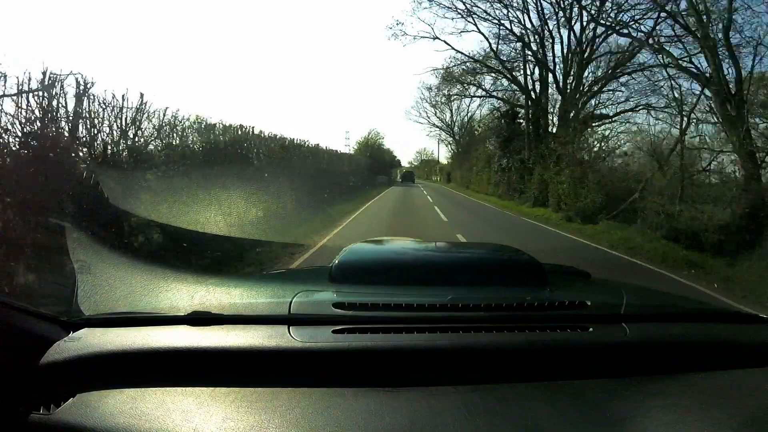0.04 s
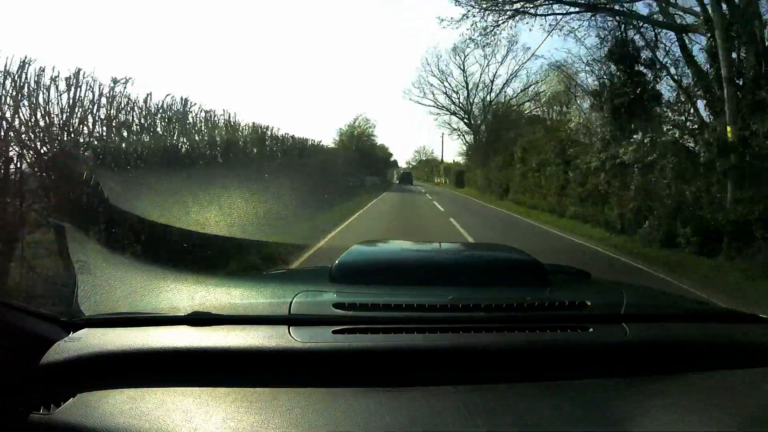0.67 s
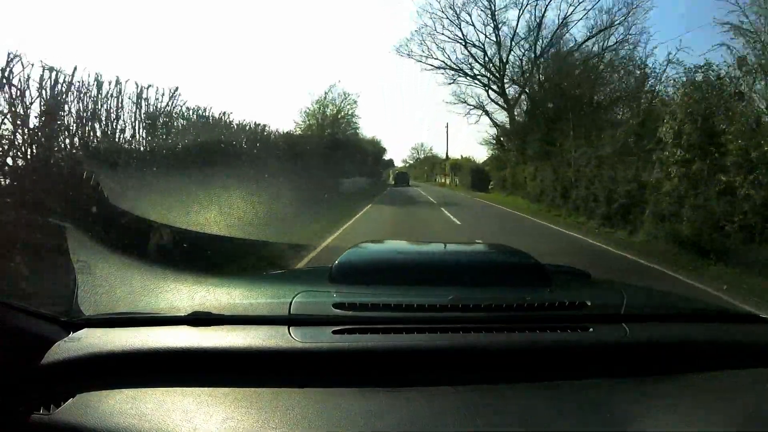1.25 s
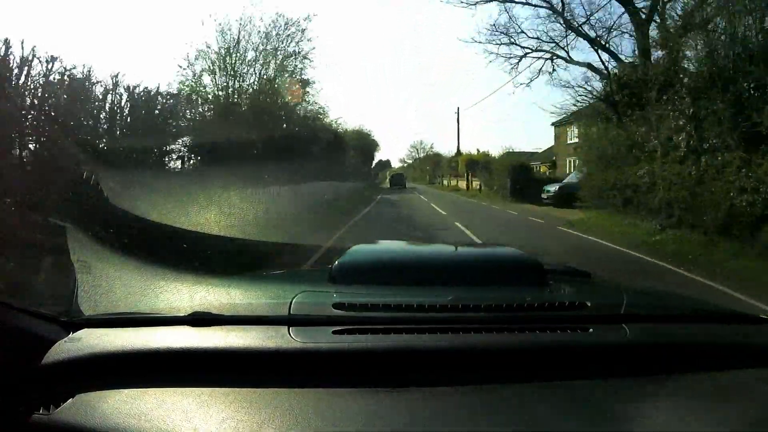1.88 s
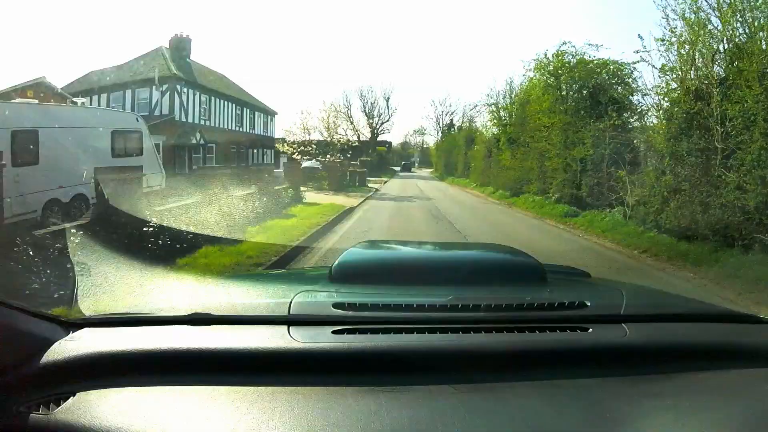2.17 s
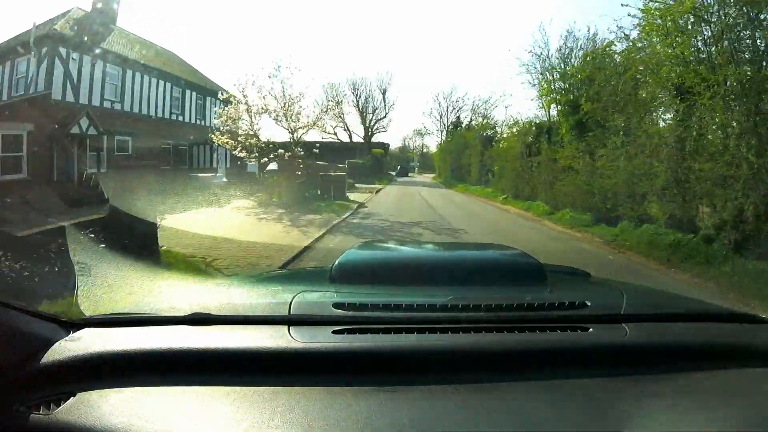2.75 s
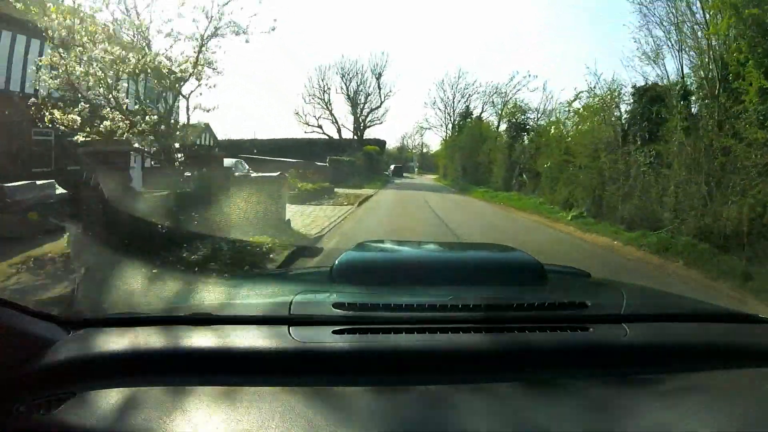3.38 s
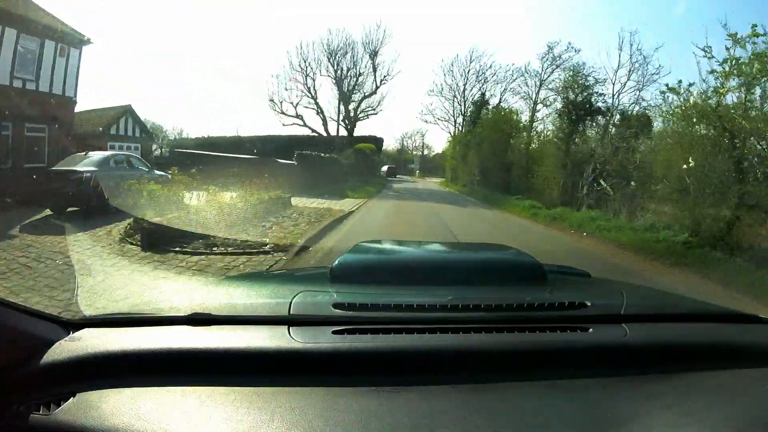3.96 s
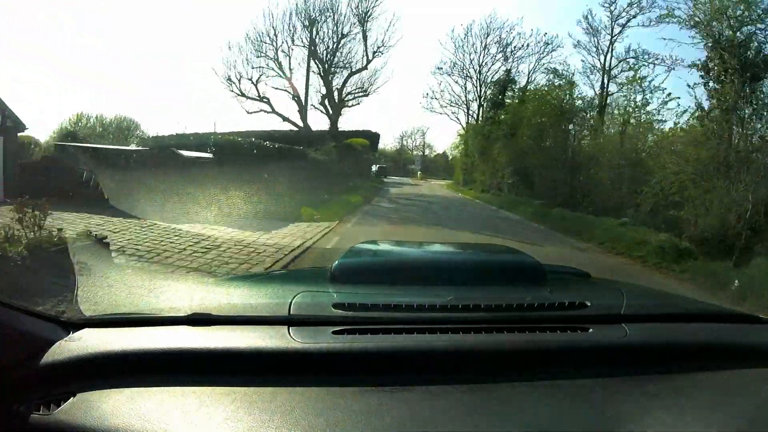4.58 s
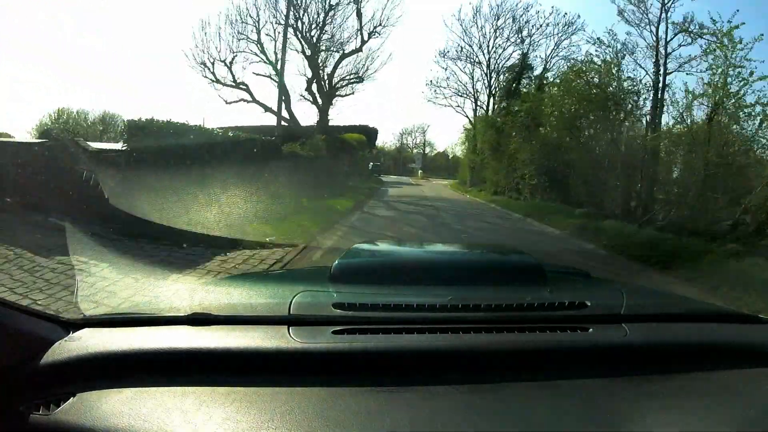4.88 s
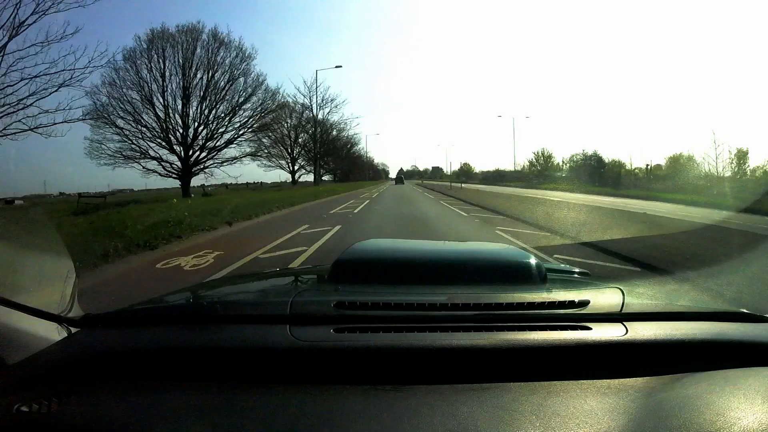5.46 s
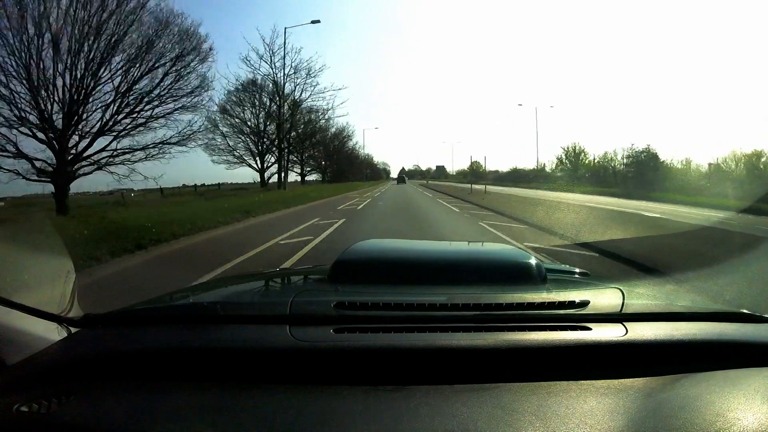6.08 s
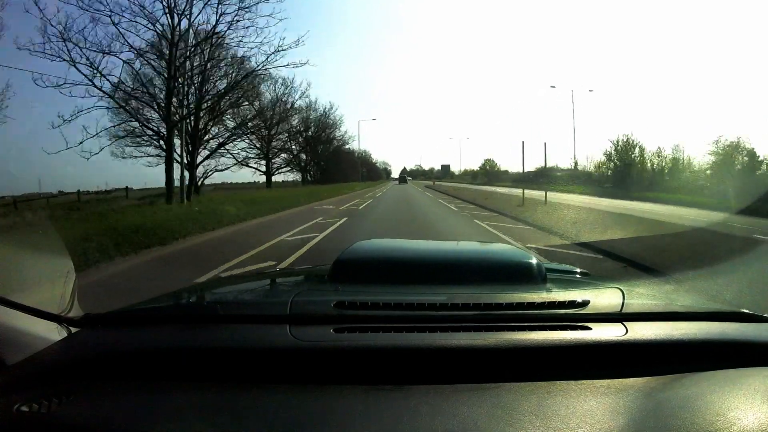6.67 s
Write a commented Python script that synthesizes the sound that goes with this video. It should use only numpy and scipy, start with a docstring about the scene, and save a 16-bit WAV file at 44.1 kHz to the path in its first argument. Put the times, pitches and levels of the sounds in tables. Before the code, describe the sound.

Inside a car, a deep rasping engine drone eases off with exhaust pops, sinks toward idle, then surges into loud acceleration.

```python
"""Inside a four-cylinder turbo car: it cruises, slows with the foot off the pedal, then pulls hard.
The engine's firings make the exhaust drone, growl and burble, while tyres and wind rush and loose trim ticks.
As the car slows, unburnt fuel pops in the exhaust and thin whines show through.
The drone overloads the microphone, which squares it off into a rasp and chops the road noise."""
import sys
import numpy as np
from scipy.fft import rfft, irfft, next_fast_len
from scipy.io import wavfile
from scipy.ndimage import uniform_filter1d, map_coordinates

SR = 44100
rng = np.random.default_rng(int(sys.argv[2]) if len(sys.argv) > 2 else 0)


def master(y):
    """Save y as 16-bit WAV."""
    cut = np.clip(np.atleast_2d(y).T, -1, 1)
    pcm = np.round(cut * 32767)  # scale
    wavfile.write(sys.argv[1], SR, pcm.astype(np.int16))


N = 296793
TIME = np.arange(N) / SR
SLOW_S, PULL_S, BLEND_S = 2.25, 5.498, .008  # slowing starts, pulling starts, length of each changeover
CLUTCH_S, DROP_HZ_PER_S, IDLE_HZ = 4.36, 31.5, 32.12  # the clutch goes down and the revs sink to idle
DRONE_DB_PER_HZ, BURBLE_DB_PER_HZ, ROAD_DB_PER_HZ = -0.6142, -0.28, -0.0556  # per firing Hz lost then
FREE_DRONE_DB, FREE_BURBLE_DB, UNLOAD_S = -1, 8, 0.18  # a free-running engine booms less, burbles more
SURGE_HZ, SURGE_DRONE_DB = 1.292, -6  # a full surge in gear: slightly higher pitch, less drone
LATE_SURGE_HZ, LATE_SURGE_DB = 18, 18  # just before the pull: the drone rises in pitch and swells
REV_UP_START_S, REV_UP_END_S = 5.6, 6.53  # the cabin's low-rev boom turns into its high-rev boom

# Engine speed when cruising, slowing and pulling: (starting firing rate [Hz], slope [Hz/s], bend [Hz/s^2])
ENGINE_SPEEDS = [(90.6, -4.3, .48), (65.2, -1.9, 0), (100.4, 21.1, 3.1)]
# Loudness in the same three stretches: (drone [dB], its rise [dB/s], burble [dB], its rise [dB/s],
# growl over drone [dB], rumble over road [dB])
STRETCH_LEVELS = [(-2.36, -2, -33, 8.5, -21, 2), (-1.93, -0.52, -21.5, 0.3, -30, 2),
                  (-1.5, 5, -30.5, 5.5, -14.5, 0)]
# Road noise and engine unsteadiness in the same three stretches:
# (road [dB], its rise [dB/s], tyres over road [dB], unsteadiness [0-1])
ROAD_AND_FLUTTER = [(-21, -0.8, -4.5, .45), (-26.6, -0.7, 1.5, 1), (-18.5, 5.5, -6, .2)]
# Brief swells of the engine's sound; in the last two the drone rises in pitch just before the pull:
# (middle [s], length [s], strength [0-1], burble [dB])
ENGINE_SURGES = [(1.413, 0.12, 0.62, -5.5), (1.531, 0.25, 0.91, -1.5), (1.679, 0.17, .55, -10.5),
                 (2.191, 0.14, 0, -9), (2.331, 0.19, 0.4, -12), (5.4, .07, .95, -17),
                 (5.48, .12, 0.91, -17)]
# The tones in the drone: (multiple of the engine cycle rate [x], cruising [dB], slowing [dB],
# pulling at low revs [dB], at middle revs [dB], at high revs [dB])
DRONE_TONES = [(1.0, -10, -41, -28, -10, 0), (2.0, -31.5, -30, -21.5, -17.5, -19.5),
               (3.0, -28, -20.5, -5.5, -8.5, -7.5), (4.0, 1.54, -7.0, 2.5, 1, -0.7),
               (5.0, -34.5, -22, -0.1, -0.5, 1.2), (6.0, -16, -64, -12.5, -21, -19),
               (7.0, -10.5, -17.5, -3, -6, -9), (8.0, -13, -15.5, -2.5, -0.4, 1.17),
               (9.0, -32, -13.5, -11.5, -10, -3.5), (10.0, -24, -28, -19.5, -23.5, -22.5),
               (11.0, -39, -15.5, -40, -16, -17), (12.0, -43, -31.5, -14, -16.5, -11.5),
               (13.0, -14.5, -41, -7.5, -15.5, -22), (14.0, -51.5, -38, -20, -42, -38),
               (15.0, -17.5, -45, -42.5, -41.5, -37.5), (16.0, -21.5, -45, -20, -10.5, -17)]
# The four cylinders' pulses reach the pipe unevenly: (place in the cycle [0-1], level [dB])
CYLINDER_PULSES = [(0.021, 0), (0.272, -4), (0.479, -0.5), (.79, 0)]
# The exhaust's higher ringing notes: (pitch [Hz], width [Hz], level [dB])
GROWL_RINGS = [(380.5, 40, 0.5), (435, 38, 4.5), (534, 60, -5), (760, 49, 1), (977, 106, -3),
               (1120, 100, -4.5), (1690, 347, -14)]
# The low ringing notes of pipe and cabin: (pitch [Hz], width [Hz], level [dB])
PIPE_RINGS = [(98.3, 15.4, -3.5), (142.4, 24.2, -2), (239, 73, -14.5), (450, 33, -20.5)]
# The rush of wind and road: (frequency [Hz], level [dB])
RUSH_SPECTRUM = [(25, -29.5), (250, -4.5), (560, -2), (850, 3), (1250, 2.1), (1550, -7.5), (2350, -15.5),
                 (2700, -21), (5000, -30), (6300, -35), (7700, -34.5), (10000, -44)]
# The boom of the tyres: (frequency [Hz], level [dB])
TYRE_SPECTRUM = [(25, 0), (100, 7), (220, 13.5), (400, 8), (600, -8), (1500, -45)]
# Rough patches of tarmac: (middle [s], length [s], boost [dB])
ROUGH_PATCHES = [(1.501, 0.31, 7), (1.679, 0.13, 3.5), (2.18, 0.16, 0.5)]
# The shaking car body: (frequency [Hz], level [dB])
RUMBLE_SPECTRUM = [(10, -5), (22, 0), (40, -2.5), (70, -1), (150, -31), (400, -77.5)]
# Ticks of loose trim: (time [s], level [dB], fade time [s])
TRIM_TICKS = [(0.135, -22.5, 0.016), (2.4, -29, 0.062), (2.439, -36, 0.18), (2.667, -51.5, .04),
              (3.656, -20.5, 0.021), (3.668, -34.5, 0.13), (4.129, -39.5, 0.098), (4.453, -43, .06),
              (4.598, -42, .07), (4.62, -44, 0.088), (6.1, -24, 0.028), (6.172, -24, 0.018)]
# The bright sound of plastic panels: (frequency [Hz], level [dB])
TRIM_SPECTRUM = [(800, -14.5), (2800, 6), (4100, 2.5), (6000, -4), (8800, -3), (10500, -16.5)]
# Thin whines in the cabin: (pitch [Hz], width [Hz], level [dB])
WHINE_RINGS = [(2330, 53, 4), (2800, 35, -4), (7580, 99, -19.5)]
# Unburnt fuel popping: (time [s], boom [dB], crack [dB], boom fade time [s], dulled above [Hz])
FUEL_POPS = [(2.392, 5.5, -14.5, 0.047, 610), (2.416, 1.5, -30, 0.18, 600), (2.669, 5, -20.5, 0.051, 450),
             (3.04, 1, -26, 0.13, 340), (3.357, 1.5, -32, 0.082, 280), (3.646, 6.5, -8.5, 0.043, 745),
             (4.584, 1, -15.5, 0.043, 755), (4.829, -0.5, -25, 0.14, 450)]
# The notes in a pop's boom; the highest is a harsh overload overtone: (pitch [Hz], width [Hz], level [dB])
POP_NOTES = [(141.2, 29.5, 3), (222, 72, 0), (268.3, 32, 0), (440, 45, -9.5), (625, 48, -10.5)]
# The sharp crack of a pop: (frequency [Hz], level [dB])
CRACK_SPECTRUM = [(100, 10), (500, -2.5), (1200, 14.5), (3000, -6), (10000, -26.5)]
# The tone of the microphone's amplifier: (frequency [Hz], gain [dB])
AMPLIFIER_TONE = [(60, 0.5), (300, 0.5), (560, 0.57), (900, -2.3), (1350, -1.63), (2300, -0.24),
                  (5000, 1.2), (10000, 2)]
# The amplifier's hiss: (frequency [Hz], level [dB])
HISS_SPECTRUM = [(100, -3), (1000, 14.5), (3000, 10), (8000, 0.5), (10500, -20)]


def amp(db):
    """Turn decibels into a number to multiply by."""
    return 10 ** (np.asarray(db) / 20)


def unit(x):
    """Scale x to an average strength (rms) of 1."""
    return x / np.sqrt(np.mean(x ** 2) + 1e-20)


def wobble(rate):
    """A smooth random curve through `rate` new values a second."""
    return map_coordinates(rng.standard_normal(int(N * rate / SR) + 4), [TIME * rate])


def filtered(x, response):
    """Multiply each frequency f in x by response(f)."""
    size = next_fast_len(N + SR // 2)
    return irfft(rfft(x, size) * response(np.fft.rfftfreq(size, 1 / SR)), size)[:N]


def gain_at(f, spectrum):
    """Read the gain at frequency f from (frequency [Hz], level [dB]) points."""
    hz, db = np.transpose(spectrum)
    return amp(np.interp(np.log(f + 1), np.log(hz), db))


def noise(spectrum):
    """Noise of strength 1, shaped by a spectrum."""
    return unit(filtered(rng.standard_normal(N), lambda f: gain_at(f, spectrum)))


def dulled(x, hz):
    """Soften the treble above hz."""
    return filtered(x, lambda f: 1 / (1 + 1j * f / hz) ** 2)


def resonate(x, rings):
    """Let x ring a set of notes, added with alternating signs."""
    return filtered(x, lambda f: sum(
        (-1) ** k * amp(db) * 1j * f * width / (hz * hz - f * f + 1j * f * width)
        for k, (hz, width, db) in enumerate(rings)))


def decay(start, fade_s):
    """Jump to 1 at the start, then fall by 60 dB in each fade time."""
    return (TIME >= start) * amp(-60 * np.abs(TIME - start) / fade_s)


def swells(middle, length):
    """One smooth rise and fall, 0-1, in a column for each event."""
    return np.cos(np.pi * np.clip((TIME[:, None] - middle) / length, -.5, .5)) ** 2


def stretch():
    """For each sample: its stretch (0 cruising, 1 slowing, 2 pulling) and the seconds into it."""
    starts = np.array([0, SLOW_S, PULL_S])
    which = np.searchsorted(starts, TIME, side="right") - 1
    return which, TIME - starts[which]


def driving():
    """Firing rate and layer gains drift and briefly surge; with the clutch down the revs sink."""
    which, t = stretch()
    start_hz, slope, bend = np.array(ENGINE_SPEEDS)[which].T
    drone_db, drone_rise, burble_db, burble_rise, growl_db, rumble_db = np.array(STRETCH_LEVELS)[which].T
    road_db, road_rise, tyre_db, _ = np.array(ROAD_AND_FLUTTER)[which].T
    middle, length, strength, surge_burble_db = np.transpose(ENGINE_SURGES)
    shapes = swells(middle, length)
    surge = shapes @ strength
    geared_hz = start_hz + slope * t + bend * t ** 2
    free_s = np.maximum(TIME - CLUTCH_S, 0) * (TIME < PULL_S)
    free = np.minimum(free_s / UNLOAD_S, 1)  # 0 in gear, 1 running free
    lost_hz = np.minimum(DROP_HZ_PER_S * free_s, geared_hz - IDLE_HZ)
    firing_hz = geared_hz - lost_hz + (SURGE_HZ + LATE_SURGE_HZ * free) * surge
    boom_db = (1 - free) * SURGE_DRONE_DB * surge + free * (FREE_DRONE_DB + LATE_SURGE_DB * surge)
    drone_gain = amp(drone_db + drone_rise * t + DRONE_DB_PER_HZ * lost_hz + boom_db)
    steady_burble = amp(burble_db + burble_rise * t + FREE_BURBLE_DB * free + BURBLE_DB_PER_HZ * lost_hz)
    burble_gain = np.hypot(steady_burble, shapes @ amp(surge_burble_db))
    road_gain = amp(road_db + road_rise * t + ROAD_DB_PER_HZ * lost_hz)
    gains = np.array([drone_gain, amp(growl_db), burble_gain, road_gain, amp(tyre_db), amp(rumble_db)])
    return firing_hz, surge, uniform_filter1d(gains, size=int(BLEND_S * SR), axis=1)


def cycle_wave(tone_db, cycles, size=4096):
    """A wave with the given tone levels, repeated once every engine cycle."""
    levels_db = np.interp(np.arange(65), np.r_[0:18, 28], np.r_[-30, tone_db, -40, -60])
    # Line the tones up so that each cycle starts sharply and rings away (minimum phase).
    cepstrum = irfft(np.log(amp(levels_db)))
    tones = np.exp(rfft(cepstrum * np.r_[1, np.full(63, 2), 1, np.zeros(63)]))
    wave = irfft(np.r_[0, tones[1:len(tone_db) + 1]], size) * size / np.sqrt(2)
    return np.interp(cycles % 1 * size, np.arange(size + 1), np.r_[wave, wave[0]])


def drone(cycles, surge, flutter_db=1.73, jitter_cycles=.0016):
    """The exhaust note: its tones change with the driving, and no two firings are quite alike."""
    slowed, pulled = [np.clip((TIME - s) / BLEND_S + .5, 0, 1) for s in (SLOW_S, PULL_S)]
    unsteady = np.array(ROAD_AND_FLUTTER)[stretch()[0], -1]
    cycles = cycles + unsteady * jitter_cycles * wobble(45)
    cruise, slow, low, middle, high = np.transpose(DRONE_TONES)[1:]
    cruising = (1 - surge) * cycle_wave(cruise, cycles) + surge * cycle_wave(low, cycles)
    # While pulling, each tone slides from its low-rev level through the middle one to the high one.
    steps = np.r_[np.linspace(low, middle, 5)[:-1], np.linspace(middle, high, 5)]
    stage = np.interp(TIME, [REV_UP_START_S, REV_UP_END_S], [0, len(steps) - 1])
    pulling = sum(np.maximum(0, 1 - np.abs(stage - k)) * cycle_wave(db, cycles)
                  for k, db in enumerate(steps))
    note = (1 - slowed) * cruising + (slowed - pulled) * cycle_wave(slow, cycles) + pulled * pulling
    return note * amp(unsteady * flutter_db * wobble(60))


def growl(cycles):
    """Each cylinder's sharp pulse rings the exhaust's higher notes, the same way in every cycle."""
    pulses = sum(amp(db) * np.diff(np.floor(cycles - place), prepend=np.floor(-place))
                 for place, db in CYLINDER_PULSES)
    return unit(resonate(pulses, GROWL_RINGS))


def burble(cycles):
    """Firings of uneven strength, and the gas that follows them, ring the pipe."""
    firings = np.flatnonzero(np.diff(np.floor(cycles * 4)))
    strength = 1 + rng.uniform(-1, 1, len(firings))
    puffs = np.zeros(N)
    puffs[firings] = strength * np.sqrt(np.gradient(firings))  # wider gaps get bigger puffs
    gas = rng.standard_normal(N)
    return unit(resonate(unit(puffs) + gas, PIPE_RINGS))


def road(tyre_gain, surface_db=-0.5, grain_db=-0.4):
    """Wind rush and tyre boom waver with the road surface and swell on rough patches."""
    middle, length, boost_db = np.transpose(ROUGH_PATCHES)
    rush = noise(RUSH_SPECTRUM) + tyre_gain * noise(TYRE_SPECTRUM)
    return rush * amp(surface_db * wobble(3.2) + grain_db * wobble(35) + swells(middle, length) @ boost_db)


def body_rumble():
    """The car body shakes with a deep rumble."""
    return noise(RUMBLE_SPECTRUM)


def trim_ticks():
    """Plastic panels tick and buzz briefly when jolted."""
    return noise(TRIM_SPECTRUM) * sum(amp(db) * decay(start, fade_s) for start, db, fade_s in TRIM_TICKS)


def whine(level_db=-59):
    """Thin, steady whines while slowing, heard once the engine goes quiet."""
    slowing = stretch()[0] == 1
    return amp(level_db) * slowing * unit(resonate(rng.standard_normal(N), WHINE_RINGS))


def exhaust_pops(crack_fade_s=0.076, rise_s=0.016):
    """Unburnt fuel flares up into a crack and a short boom; the silencer dulls the boom."""
    out, crack = np.zeros(N), noise(CRACK_SPECTRUM)
    for start, boom_db, crack_db, boom_fade_s, silencer_hz in FUEL_POPS:
        flare = 1 - decay(start, rise_s)
        blast = flare * decay(start, boom_fade_s) * rng.standard_normal(N)
        boom = dulled(resonate(blast, POP_NOTES), silencer_hz)
        out += amp(boom_db) * boom / np.abs(boom).max()
        out += amp(crack_db) * flare * decay(start, crack_fade_s) * crack
    return out


def scene():
    """Add up everything heard at the dashboard, in one channel."""
    firing_hz, surge, gains = driving()
    drone_gain, growl_gain, burble_gain, road_gain, tyre_gain, rumble_gain = gains
    cycles = np.cumsum(firing_hz) / SR / 4  # engine cycles so far, four firings in each
    engine = drone_gain * (drone(cycles, surge) + growl_gain * growl(cycles))
    engine += burble_gain * burble(cycles)
    rolling = road_gain * (road(tyre_gain) + rumble_gain * body_rumble())
    return (engine + rolling + exhaust_pops() + trim_ticks() + whine())[None]


def record(dry, ceiling=0.5, hardness=7, leak=0.0069, leak_hz=230, bass_hz=9, top_hz=10370, hiss_db=-59):
    """The overloaded microphone flattens the wave's tops; its amplifier colours the tone and hisses."""
    sound = dry[0]
    flattened = sound / (1 + np.abs(sound / ceiling) ** hardness) ** (1 / hardness)
    rounded = flattened + leak * dulled(sound - flattened, leak_hz)  # a little overload leaks past
    # A capacitor blocks the deepest bass, which tilts the tops.
    coloured = filtered(rounded, lambda f: gain_at(f, AMPLIFIER_TONE) * 1j * f / (bass_hz + 1j * f))
    hissy = coloured + amp(hiss_db) * noise(HISS_SPECTRUM)
    return filtered(hissy, lambda f: 1 / np.sqrt(1 + (f / top_hz) ** 120))[None]  # steep treble cut


dry = scene()
out = record(dry)
master(out)
```